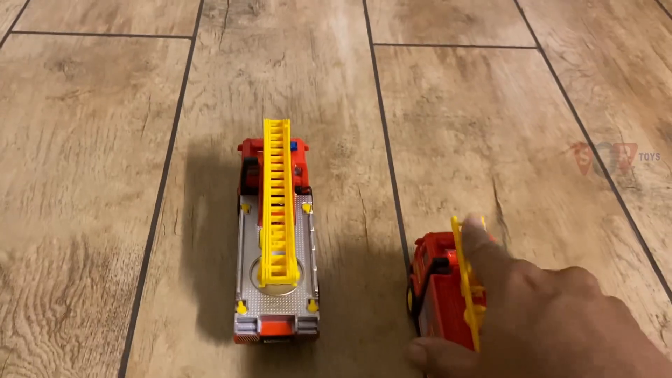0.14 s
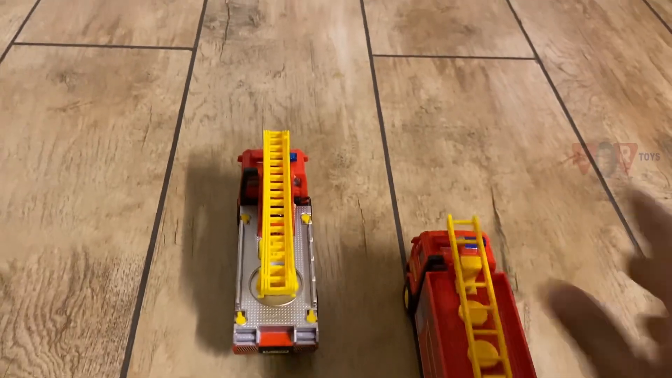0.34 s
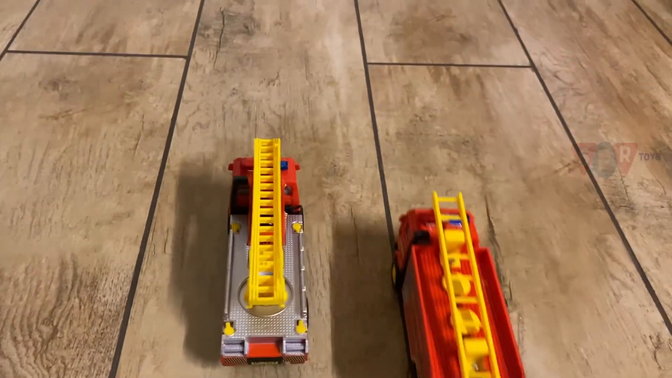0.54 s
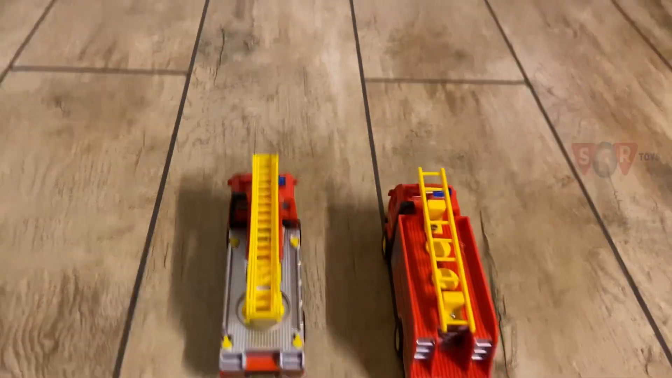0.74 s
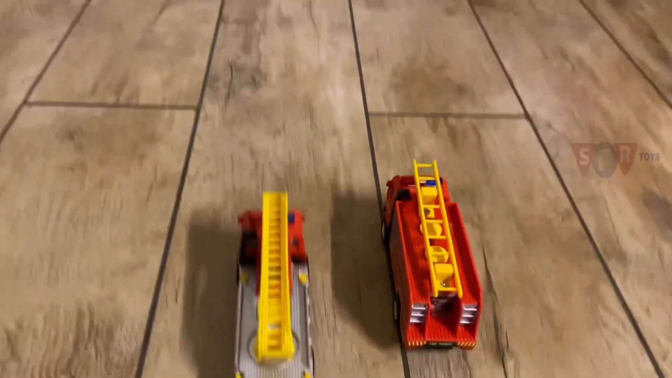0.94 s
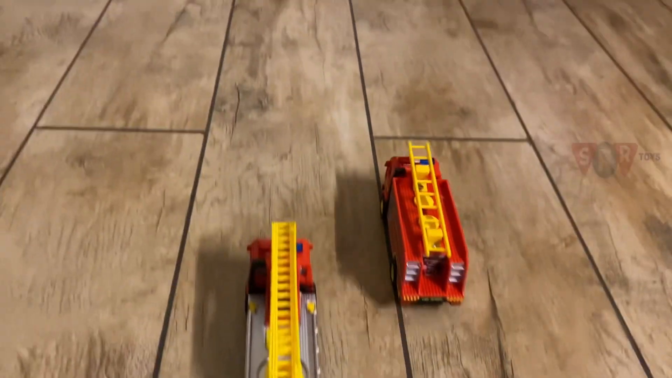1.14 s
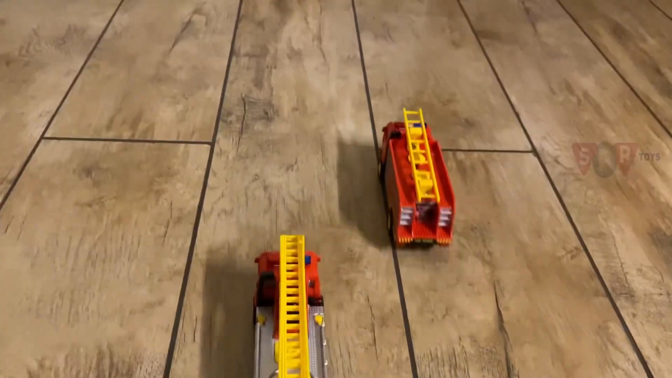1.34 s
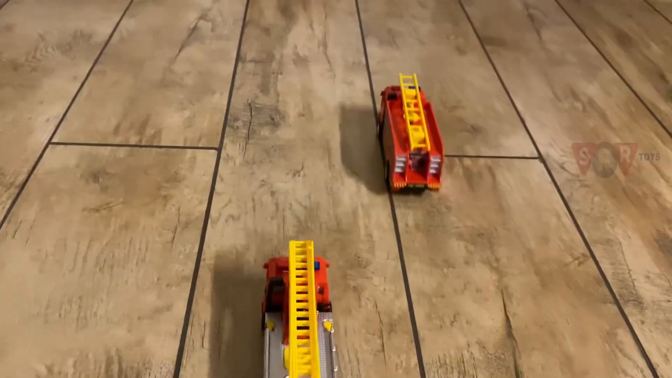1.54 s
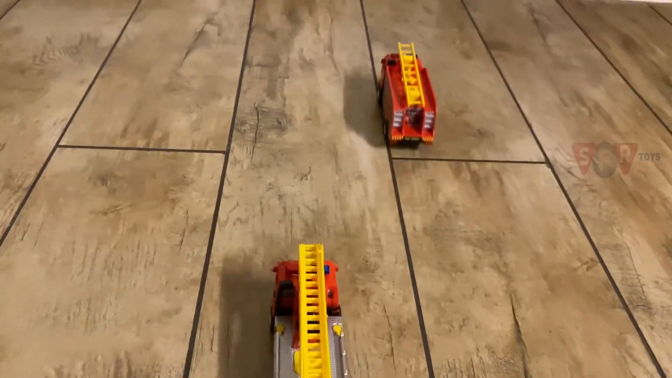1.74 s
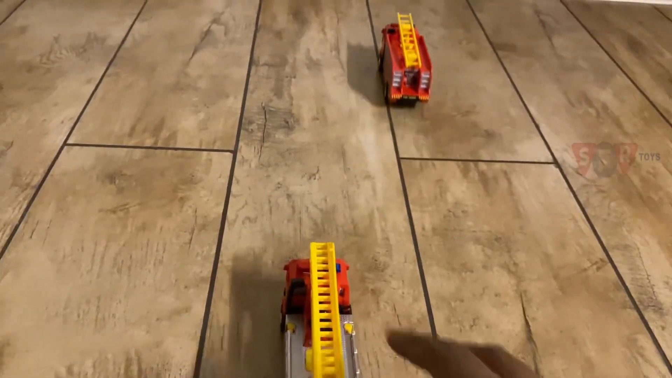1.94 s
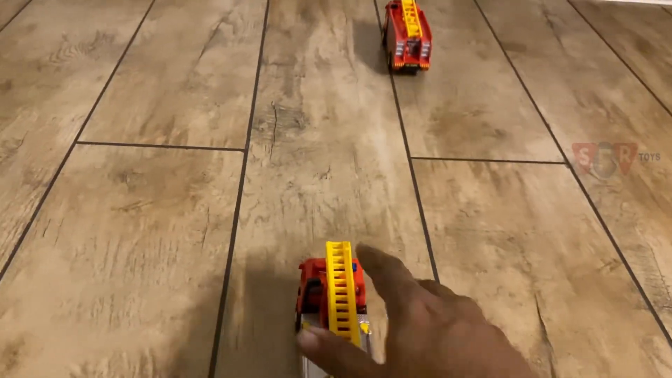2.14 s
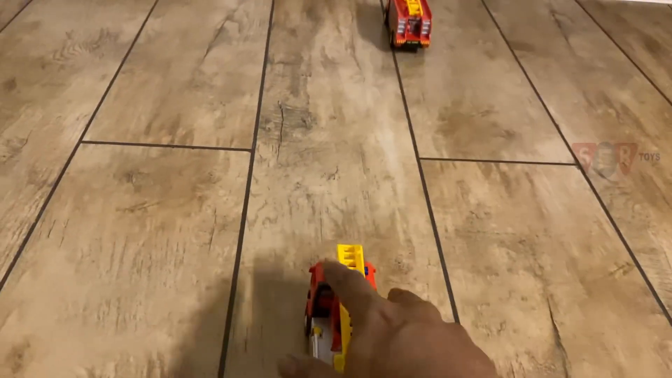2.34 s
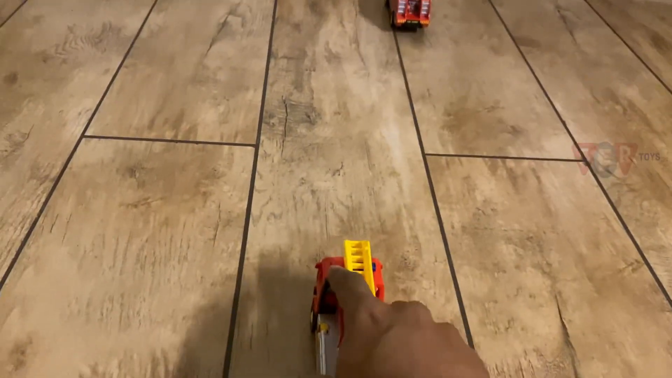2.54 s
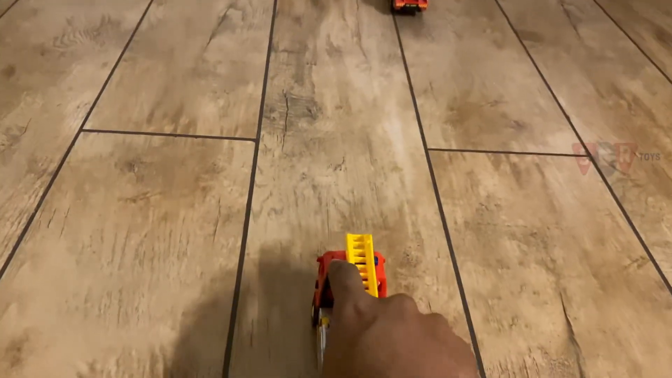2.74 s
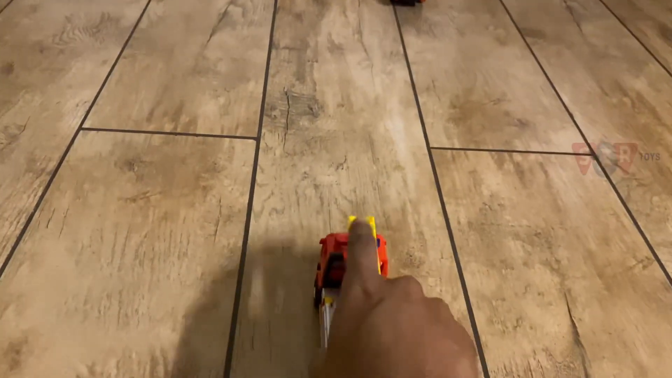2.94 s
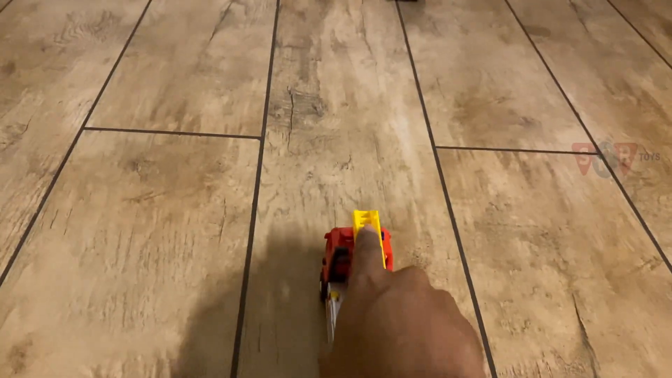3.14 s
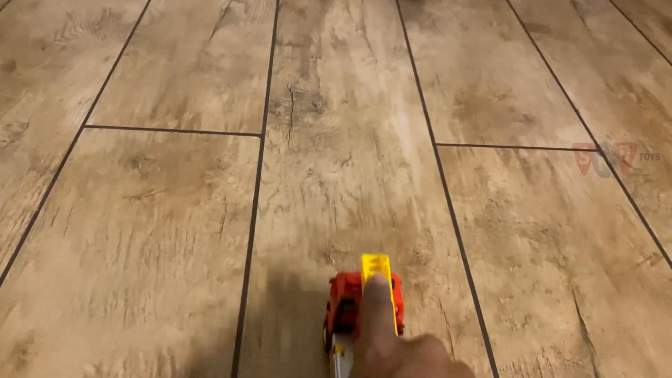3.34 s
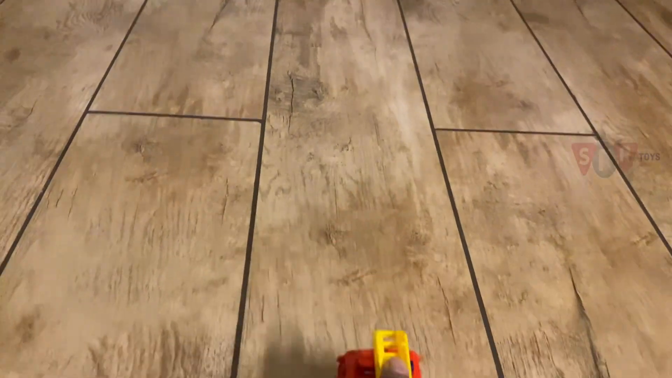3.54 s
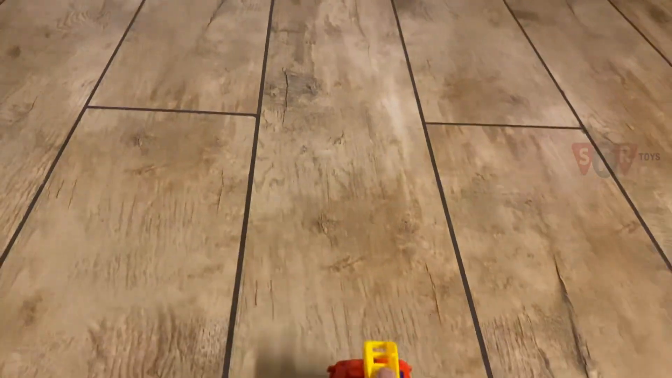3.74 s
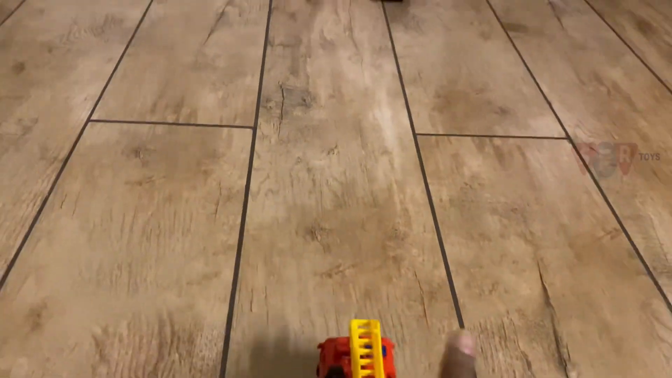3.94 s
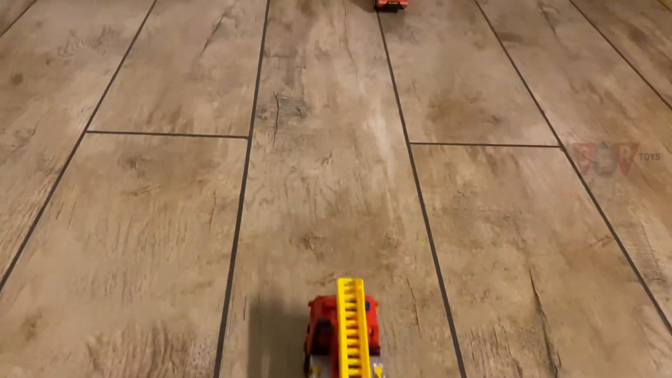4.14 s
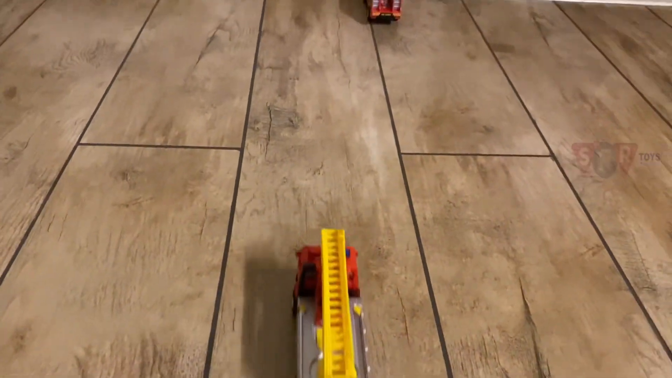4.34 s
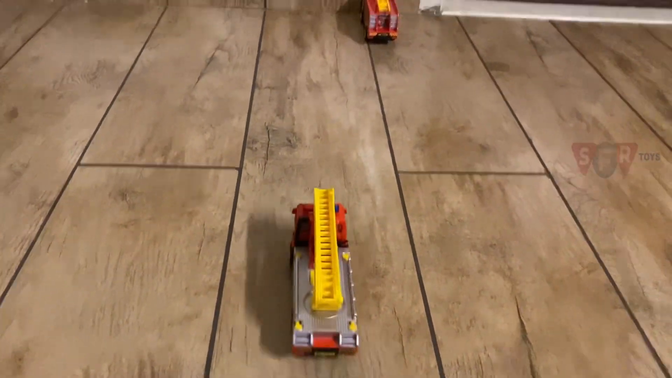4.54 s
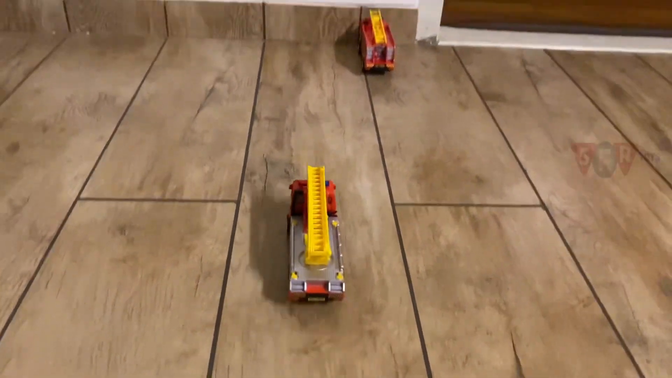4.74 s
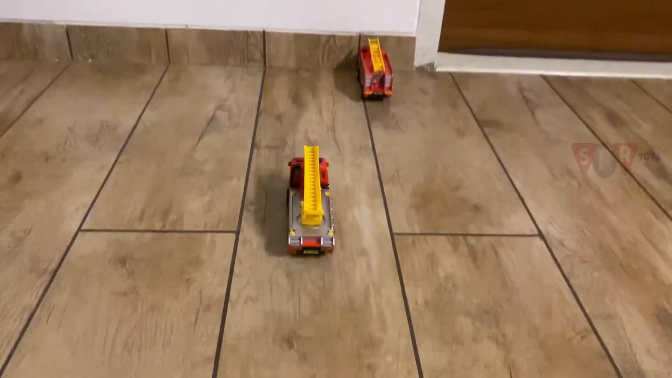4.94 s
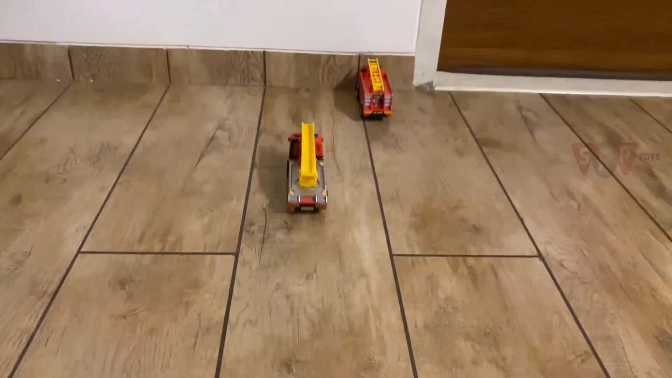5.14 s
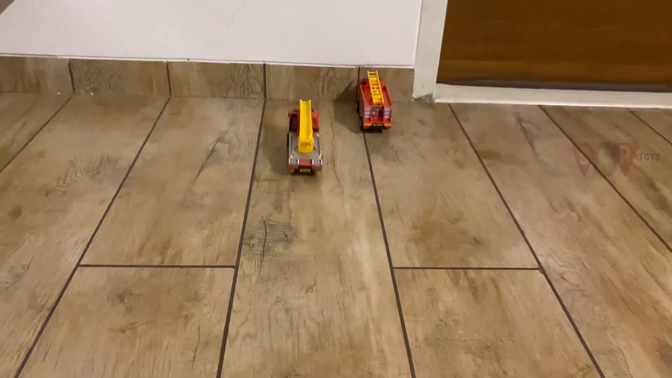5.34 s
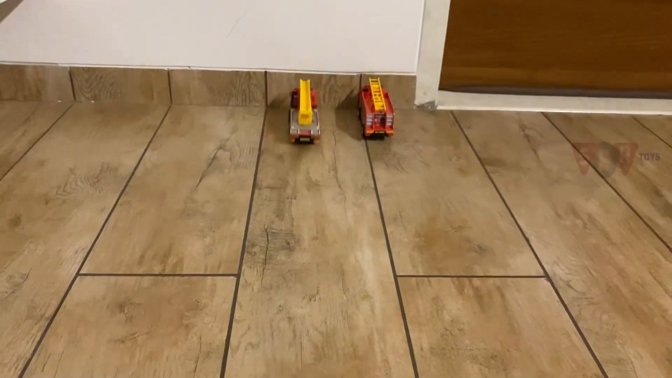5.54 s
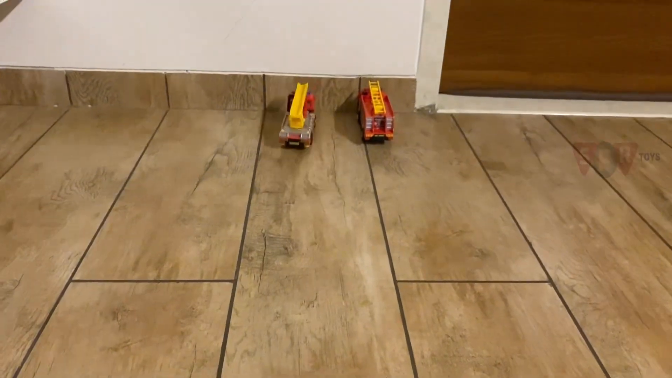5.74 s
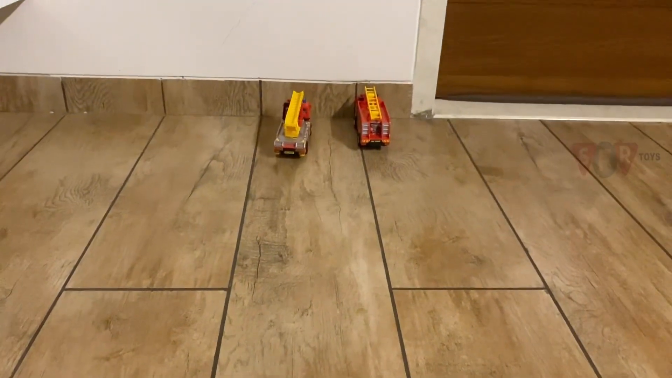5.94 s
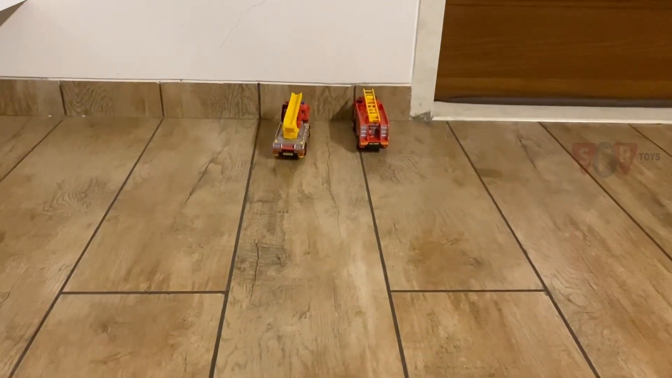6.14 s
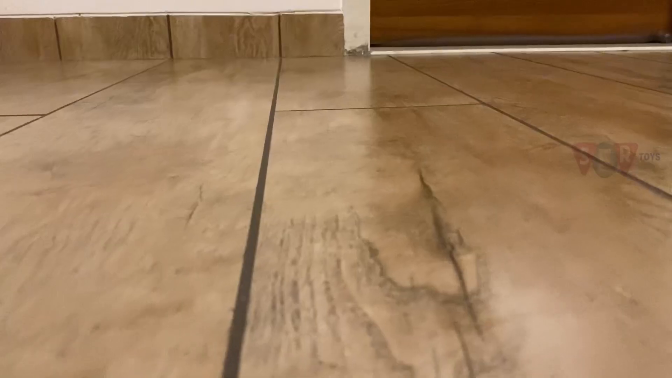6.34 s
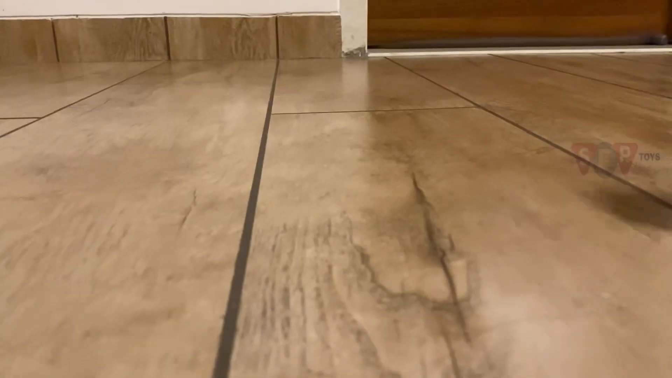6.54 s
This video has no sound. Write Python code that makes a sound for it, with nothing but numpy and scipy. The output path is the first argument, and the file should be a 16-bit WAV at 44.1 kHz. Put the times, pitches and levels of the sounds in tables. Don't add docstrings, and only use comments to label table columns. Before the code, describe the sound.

A toy truck buzzes off over tiles, a spring is ratcheted back by hand, then another truck rattles away and cracks into the wall base.

```python
import sys
import numpy as np
from scipy import signal
from scipy.fft import rfft, irfft
from scipy.io import wavfile
from scipy.ndimage import uniform_filter1d

SR = 44100
rng = np.random.default_rng(int(sys.argv[2]) if len(sys.argv) > 2 else 0)


def volts(x):
    e = np.asarray(x, float) / 20
    return 10 ** e


def store_pcm(level_fs):
    pcm = np.round(np.clip(level_fs, -1, 1) * 32767).astype(np.int16)
    wavfile.write(sys.argv[1], SR, np.atleast_2d(pcm).T)


N = 291060
CUT_S = 6.338

# [f/Hz, level/dB]
RUMBLE_COLOUR = [(15, -71.5), (25, -27.5), (45, -8.5), (64, 8), (102, 1), (156, -4), (215, -11.5),
                 (300, -20), (390, -52), (660, -120)]
AIR_COLOUR = [(150, -36), (200, 3.5), (450, -3), (800, -1), (1200, -10.5), (2000, -74)]
HISS_COLOUR = [(300, -8), (1000, -10.5), (3000, -17.5), (9000, -26), (16000, -36)]
# [t/s, level/dB]
DRONE_LEVEL = [(0, -79), (.65, -70.5), (3.8, -69.5), (4.6, -63), (6.04, -62.5), (6.3, -75), (6.35, -76.5),
               (6.6, -70)]
# [t/s, f/Hz, level/dB]
PHONE_THUMP = [
    (0.15, 119.9, -72),
    (0.256, 71.8, -49.5),
    (0.3, 75.6, -52.5),
    (0.528, 77, -60.5),
    (0.619, 71.9, -76),
]
# [t/s, level/dB, f/Hz, length/s]
CREAK = (2.88, -71, 425, .035)
# [f/Hz, t60/s]
ROOM_DECAY = [(250, 0.25), (660, 0.42), (1740, 0.51), (4590, 0.5), (12100, 0.36)]

# [t/s, level/dB, f/Hz, t60/s]
CRASH_BLOWS = [(5.6057, -18.5, 10300, 0.0087), (5.6056, -21, 4500, .008), (5.6067, -14, 2850, 0.023),
               (5.6103, -11.5, 1700, .008), (5.6135, -23.5, 9900, 0.01), (5.618, -23.5, 11000, .008),
               (5.618, -26, 5400, .012), (5.6062, -23, 1400, .014)]
# [f/Hz, level/dB]
CRASH_COLOUR = [(100, -20.5), (200, -19), (980, -21.5), (1130, 0.5), (1400, -6.5), (1680, -5), (2200, -11),
                (2900, -4.5), (3500, -9.5), (4500, -8.5), (7900, -12), (8550, -30), (9200, -11),
                (12000, -13), (16000, -33.5)]
# [f/Hz, width/Hz, level/dB]
BOARD_MODES = [(1660, 65, -3.5), (2900, 250, -1), (4540, 400, -5)]
# [f/Hz, level/dB]
BUMPER_COLOUR = [(500, -30), (1150, 0), (16000, 0)]

# [f/Hz, width/Hz, level/dB]
SHELL_MODES = [
    [(1110, 80, -7), (1400, 80, -1), (1790, 60, -5), (2520, 110, -4), (2750, 120, 0), (3370, 70, -12),
     (4650, 350, -18), (6790, 320, -13)],
    [(1640, 160, 0), (2900, 900, -10), (4400, 300, -17)],
    [(1170, 140, -8), (1380, 260, 0), (2000, 200, -8), (2520, 160, -2), (2900, 200, -2), (4350, 210, -10)],
    [(450, 400, 6), (2550, 500, -6), (3370, 500, -6)],
]
# [f/Hz, level/dB]
CLATTER_COLOUR = [(300, -34), (700, 1), (1250, 13), (3000, 6.5), (4500, -8), (8000, -33.5)]
FIZZ_COLOUR = [(2500, -9.5), (3800, 4), (7500, 1.5), (8500, 8), (11000, -0.5), (13500, -4), (15600, -6),
               (16000, -44)]
SHEEN_COLOUR = [(6000, -30), (10000, -6), (14000, 0), (16500, -3)]
SMALL_SHELL = [(250, -24), (500, -9.5), (800, 0.5), (16000, -1)]
# [clatter under the modes/dB, fizz tilt/(dB/octave), room/dB, knock t60/s,
# fizz at -60 dB effort/dB]
FEEL = [
    (-7, -2, -5, 0.042, -66),
    (-14.5, -1, -7, 0.02, -63),
    (-2.5, -2, -3.5, 0.012, -64),
    (6, 0, -6.5, 0.036, -68),
]
# [knock rattle/dB, knock ring/dB, ring t60/s, knock rise/s, panel clumps/dB,
# tick into shell/dB, pawl ring/dB]
TOUCH = [
    (-3.5, -0.5, 0.041, 0.0025, 8, -9, -11.5),
    (-5.5, 0.5, 0.027, 0.0015, 6.5, -16, -9),
    (-1, -3.5, 0.028, 0.00078, 6.5, -12.5, -8),
    (-0.5, -3, 0.032, 0.0012, 10, -17, -17),
]
# [extra fizz/dB, extra sheen/dB, fade/s]
NEAR = [
    (7, 5, .6),
    (0, 4, 1.5),
    (2.5, 3, .6),
    (0, -20, 1.5),
]
PAWLS_HZ = [6700, 4400, 4600, 4400]

# [t/s, level/dB]
FIRST_RUN = [
    (0, -73),
    (.235, -92),
    (.31, -67),
    (.79, -61),
    (1.52, -52.5),
    (2.2, -56),
    (2.7, -65.5),
    (3.01, -68.5),
    (3.15, -110),
]
WINDING = [
    (3.15, -106),
    (3.19, -65),
    (3.29, -54),
    (3.4, -48.5),
    (3.57, -54),
    (3.64, -61),
    (3.7, -81),
    (3.87, -71),
    (3.94, -87),
]
SECOND_RUN = [
    (3.94, -65),
    (4.028, -57.5),
    (4.168, -58.5),
    (4.782, -54),
    (5.226, -52.5),
    (5.62, -53.5),
]
CLOSE_WINDING = [
    (6.33, -63.5),
    (6.4, -59.5),
    (6.6, -57),
]
# [t/s, peak level/dB,
# f/Hz]
FIRST_KNOCKS = [(.382, -51.5, 4300), (.4644, -54, 3640), (.5218, -56.5, 1760), (.5732, -48.5, 1400),
                (.6176, -47, 2570), (.6365, -49, 1410), (.6745, -51, 1430), (.755, -50, 2600),
                (.7034, -46.5, 2534), (.7238, -48.5, 1386), (.7822, -48.5, 2680), (.8126, -46.5, 1480),
                (.8381, -56, 1380), (.8685, -52, 1370), (.8994, -43.5, 1445), (.945, -51, 2600),
                (.9628, -46, 1345), (1.0012, -40.5, 1395), (1.0281, -40.5, 2494), (1.0486, -47, 2800),
                (1.1005, -44, 2660), (1.3554, -44, 2700), (1.465, -43, 1386), (1.541, -46, 2650),
                (1.0665, -42.5, 2650), (1.092, -43.5, 2370), (1.1189, -38, 2690), (1.2426, -46, 2550),
                (1.288, -40.5, 1765), (1.3035, -36.5, 2756), (1.3329, -40.5, 1358), (1.3848, -43, 1540),
                (1.4452, -40, 2570), (1.4956, -47, 2650), (1.528, -46, 1420), (1.5569, -43, 2740),
                (1.611, -41, 2625), (1.6202, -38, 2650), (1.7, -47, 2690), (1.71, -44, 1390),
                   (1.8573, -48, 2710), (1.9133, -46.5, 2690), (1.982, -49, 1400), (2.207, -48, 2500),
                   (1.64, -40.5, 2750), (1.682, -42.5, 2750), (1.7484, -37.5, 2650), (1.7866, -50, 1790),
                   (1.893, -45, 2540), (1.9984, -43, 1493), (2.0503, -39.5, 2665), (2.069, -42, 2660),
                   (2.1336, -42.5, 2900), (2.152, -44.5, 1430), (2.187, -45, 2620), (2.2558, -40, 2716),
                   (2.336, -45.5, 2880), (2.467, -49.5, 2730), (2.353, -58, 1420), (2.492, -52, 2760),
                   (2.5145, -46.5, 2740), (2.5605, -55, 2900), (2.5954, -58, 2880), (2.636, -58.5, 1360),
                   (2.6742, -59, 2860), (2.7196, -60, 2850), (2.779, -59, 2900), (2.8882, -54, 3840),
                   (2.905, -56.5, 1190), (2.9312, -47, 2825), (2.9805, -55, 5250), (3.0314, -59.5, 2920)]
HAND_KNOCKS = [(.091, -62, 915), (0.104, -39.5, 1500), (.1045, -47, 4330), (.111, -44.5, 1400),
               (.124, -57, 1300), (3.2132, -52, 1645), (3.245, -55, 1100), (3.283, -47, 1550),
               (3.2996, -45, 1620), (3.313, -50, 1640), (3.354, -39, 1600), (3.385, -50, 1700),
               (3.4442, -43.5, 1610), (3.4796, -43.5, 1600), (3.537, -45, 1550), (3.5754, -49, 1650),
               (3.5942, -58, 1680), (3.6335, -52, 1720), (3.33, -39, 1730), (3.3716, -36.5, 1630),
               (3.4272, -45, 1660), (3.462, -38, 1576), (3.5095, -42, 1740), (3.5458, -36.5, 1760),
               (3.793, -55, 1590), (3.8079, -48, 2750), (3.8115, -48.5, 1385), (3.8274, -50, 4400),
               (3.8393, -53, 1360)]
SECOND_KNOCKS = [(3.982, -58.5, 1040), (4.121, -52, 1610), (4.1527, -58, 1290), (4.1823, -56, 2950),
                 (4.2452, -59, 2970), (4.274, -54, 2950), (4.3118, -49, 1280), (4.3254, -55, 1280),
                 (4.373, -60, 2980), (4.4095, -53, 1160), (4.471, -56, 1290), (4.5067, -54, 2950),
                 (4.549, -53, 2010), (4.567, -49, 1330), (4.593, -52, 2430), (4.6198, -49.5, 1340),
                 (4.9131, -45.5, 2450), (5.3287, -47, 2540), (4.6626, -47, 1340), (4.7023, -42, 2490),
                 (4.7111, -34, 2420), (4.8259, -45, 2400), (4.8358, -34, 2530), (4.9513, -37, 2050),
                 (5.0589, -36, 1370), (5.1615, -39, 1400), (5.2622, -39.5, 1250), (5.362, -41.5, 2810),
                 (5.4025, -46.5, 1390), (5.452, -43, 1170), (5.511, -48, 2450), (5.565, -47.5, 2460)]
CLOSE_KNOCKS = [
    (6.3922, -48.5, 3410),
    (6.5337, -51, 1550),
    (6.5365, -45.5, 3490),
]
# [t/s, peak level/dB]
FIRST_TICKS = [(0.3833, -46), (0.4614, -48), (0.5217, -48), (0.57, -48), (0.6182, -52), (0.6487, -70),
               (0.676, -63), (0.705, -47.5), (0.7449, -49.5), (0.7773, -51), (0.8116, -47.5),
               (0.8382, -51), (0.8997, -56), (0.9457, -52), (0.9782, -47), (1.0043, -49), (1.0286, -49.5),
               (1.0558, -49), (1.085, -48), (1.1176, -43), (1.14, -54), (1.197, -50), (1.2179, -50),
               (1.2405, -50), (1.2882, -56), (1.3025, -41.5), (1.3316, -57), (1.3552, -50), (1.387, -43),
               (1.4436, -49), (1.5102, -47), (1.538, -57), (1.5707, -48),
               (1.5906, -51), (1.6193, -48), (1.6964, -49), (1.7245, -46), (1.767, -47.5), (1.8079, -51),
                  (1.844, -48), (1.8925, -48), (1.9061, -49), (1.9455, -51), (1.966, -58), (1.9974, -52),
                  (2.0128, -48), (2.0478, -48), (2.0762, -51), (2.1112, -47.5), (2.1517, -50),
                  (2.1685, -50), (2.189, -54), (2.2099, -54), (2.2334, -47.5), (2.256, -52), (2.28, -50),
                  (2.305, -49), (2.3307, -47.5), (2.3534, -48.5), (2.3787, -51), (2.4095, -57),
                  (2.439, -56), (2.4644, -54), (2.4926, -55), (2.5267, -54), (2.5595, -50), (2.5953, -51.5),
                  (2.637, -49.5), (2.6754, -47.5), (2.7205, -51), (2.7797, -60), (2.846, -54.5),
                  (2.8889, -52), (2.9165, -49.5), (2.9325, -47), (2.9557, -53), (2.9805, -48.5),
                  (3.0308, -53.5)]
HAND_TICKS = [(0.1045, -49), (0.1344, -58), (3.191, -55), (3.212, -50.5), (3.244, -62), (3.281, -38.5),
              (3.3288, -44), (3.3535, -36), (3.3698, -32.5), (3.4241, -34.5), (3.4438, -40.5),
              (3.5429, -47), (3.5548, -38), (3.5755, -45), (3.6033, -41), (3.6177, -42), (3.633, -46),
              (3.8079, -43), (3.8268, -51), (3.936, -53.5)]
SECOND_TICKS = [(3.9933, -49), (4.0382, -44), (4.0856, -48), (4.1205, -48), (4.1529, -48), (4.1828, -49),
                (4.2123, -50), (4.2437, -53), (4.2736, -50), (4.3016, -45), (4.351, -50), (4.3714, -51),
                (4.4009, -46.5), (4.4263, -59), (4.4487, -54), (4.4692, -43.5), (4.5081, -44),
                (4.5271, -44), (4.548, -48), (4.5665, -44), (4.5924, -49), (4.6209, -47), (4.6812, -44),
                (4.7012, -34.5), (4.8354, -39.5), (4.8833, -45), (4.9127, -45), (4.9506, -41.5),
                (5.0594, -41.5), (5.1472, -49), (5.1616, -39), (5.2504, -46.5), (5.2634, -43.5),
                (5.3148, -43.5), (5.3282, -42), (5.3527, -46), (5.3736, -43), (5.4175, -48), (5.442, -44.5),
                (5.5083, -46), (5.5363, -46.5), (5.5662, -47.5)]
CLOSE_TICKS = [(6.3764, -46.5), (6.4083, -44.5), (6.44, -45), (6.4732, -45), (6.4996, -43), (6.529, -42.5),
               (6.558, -44.5)]

# [f/Hz, phase/rad]
PORT_LEAD = [
    [(0, 0), (1380, -.2), (3700, 1.2), (6630, -.2), (7700, -.8), (8200, -2.9), (8800, -3.35), (9250, -4.4),
     (10400, -6.2), (11600, -6.3), (12700, -9.0), (14200, -9.7), (15200, -12.4), (16700, -12.6)],
    [(0, 0), (260, 0.1), (860, -2.9), (1120, -2.7), (2070, -6.1), (3960, -7.2), (4910, -7.8), (5600, -7.3),
     (7670, -8.6), (8350, -8.5), (9820, -7.4), (10500, -7.1), (11800, -6.3), (16700, -6.3)],
]
# [f/Hz, level/dB]
PORT_TILT = [
    [(60, 3.5), (200, 1), (2000, 1.5), (5000, 3), (7500, 3.5), (8200, 0)],
    [(200, -3), (700, -7), (5500, -10), (7500, -2), (9000, 0)],
]
# [f/Hz, shared part 0..1]
PORT_MERGE = [(230, .93), (450, .45), (800, .1), (1500, .25), (3000, 0), (7600, 0), (8200, .95),
              (9100, .95), (9800, .7), (12300, .8), (13000, .975)]


def evened(x):
    return x / np.sqrt(np.mean(x ** 2) + 1e-20)


def read(points, hz):
    f, value = np.transpose(points)
    return np.interp(np.log(hz + 1), np.log(f + 1), value)


def fader(points):
    s, db = np.transpose(points)
    return volts(np.interp(np.arange(N) / SR, s, db, -140, -140))


def colour(x, points, tilt_db=0):
    hz = abs(np.fft.fftfreq(4096, 1 / SR))
    gain = np.log(volts(read(points, hz) + tilt_db * np.log2(hz / 6000 + 1e-2)))
    taps = np.fft.ifft(np.exp(gain - 1j * signal.hilbert(gain).imag)).real[:2048]
    return signal.oaconvolve(x, taps / np.linalg.norm(taps))[:len(x)]


def resonate(x, hz, width):
    r = np.exp(-np.pi * width / SR)
    angle = 2 * np.pi * hz / SR
    return signal.lfilter([1 - r * r], [1, -2 * r * np.cos(angle), r * r], x) * np.sin(angle)


def hum_band(x, hz, width):
    return evened(resonate(resonate(x, hz, width), hz, width))


def add(mix, s, sound):
    part = mix[round(s * SR):][:len(sound)]
    part += sound[:len(part)]


def clumps(depth_db, length_s):
    span = round(length_s * SR / 32)
    slow = uniform_filter1d(rng.standard_normal(N // 32 + 1), span)
    slow = evened(uniform_filter1d(slow, span))
    return np.repeat(volts(depth_db * np.tanh(slow)), 32)[:N]


def burst(db, t60, rise):
    t = np.arange(1300) / SR
    shape = volts(-60 * t / t60) * np.minimum(t / rise, 1)
    noise = shape * rng.standard_normal(len(t))
    return volts(db) * noise * np.linalg.norm(shape) / np.linalg.norm(noise)


def ring(db, hz, t60, rough=0.7, rise=.00012):
    t = np.arange(1300) / SR
    flutter = evened(uniform_filter1d(rng.standard_normal(len(t)), size=14))
    tone = np.sin(2 * np.pi * hz * t) * (1 + rough * flutter)
    return volts(db - 60 * t / t60) * tone * np.minimum(t / rise, 1)


def air():
    noise = rng.standard_normal((3, 2, N))
    t = np.arange(N) / SR
    after_cut = t > CUT_S
    crash_s = CRASH_BLOWS[0][0]
    thud = (t > crash_s) * volts(-60 * abs(t - crash_s) / 0.51)

    rumble = volts(-61 - 12 * np.maximum(1 - t / 0.21, 0) - 25 * after_cut) * clumps(2.5, .05)
    boom = [evened(evened(colour(v, RUMBLE_COLOUR)) + 0.64 * hum_band(v, 66, 22)) for v in noise[0]]

    drone = fader(DRONE_LEVEL) * clumps(1.2, 0.049) + volts(-51) * thud
    hum = [hum_band(v, 152, 18) for v in noise[1]]

    rolling = fader(FIRST_RUN) * volts(5.0 - 4.16 * t)
    rolling = rolling + volts(-9.5) * (fader(WINDING) + fader(SECOND_RUN))
    low = volts(-79.5) + volts(-12.5) * rolling + volts(-49.5) * thud
    wash = [evened(colour(v, AIR_COLOUR)) for v in noise[2]]

    rub = volts(-59.5) * np.clip((t - CUT_S) / 0.19 + 0.24, 0, 1) * after_cut
    skin = [hum_band(v, 495, 360) for v in noise[2]]

    s, db, hz, length = CREAK
    creak = volts(db) * np.sin(2 * np.pi * hz * t) * np.exp(-((t - s) / length) ** 2)

    s, hz, db = np.transpose(PHONE_THUMP)
    phase = 2 * np.pi * np.cumsum(np.interp(t, s, hz)) / SR
    thump = np.sqrt(2) * volts(np.interp(t, s, db, -140, -140)) * np.sin(phase)
    return rumble * boom + drone * hum + low * wash + rub * skin + creak + thump


def room(x):
    slots = np.arange(300, SR - 20, 12)
    at = slots + rng.integers(0, 12, (2, len(slots)))
    taps = np.zeros((2, SR))
    np.put_along_axis(taps, at, rng.choice([-1., 1.], at.shape), 1)
    hz, t, z = signal.stft(taps, SR, nperseg=256)
    decay = volts(-60 * t / read(ROOM_DECAY, hz)[:, None])
    tail = signal.istft(z * decay, SR, nperseg=256)[1]
    return signal.fftconvolve(x[None], tail / np.linalg.norm(tail[0]), axes=1)[:, :N]


def crash():
    direct, feed = np.zeros((2, N))
    start = CRASH_BLOWS[0][0]
    for s, db, hz, t60 in CRASH_BLOWS:
        add(direct, s, ring(db, hz, t60, rough=.3))
    add(direct, start, burst(-25.5, 0.038, .0008))
    add(feed, start, volts([2.5]))
    board = sum(volts(db) * resonate(feed, hz, width) for hz, width, db in BOARD_MODES)
    board = volts(-5.5) * board / np.linalg.norm(board)
    return colour(direct, BUMPER_COLOUR), colour(feed, CRASH_COLOUR) + board


def chatter(per_s, spread_db):
    size = volts(spread_db * np.minimum(rng.exponential(1, N), 3)) * rng.choice([-1, 1], N)
    return size * (rng.random(N) < per_s / SR)


def body(teeth, level, blows, modes, clatter_db, clump_db):
    click = signal.unit_impulse(2048)
    panels = [volts(db) * resonate(click, hz, 0.8 * width) for hz, width, db in modes]
    panels.append(volts(clatter_db - 13.5) * colour(click, CLATTER_COLOUR))
    # extra dB a dB, by octaves over 1400 Hz
    brighten = [0.67 * np.clip(np.log2(hz / 1400), 0, 1) for hz, *_ in modes]
    wakes = [(level / volts(-60)) ** more for more in brighten] + [1]
    shared = teeth * clumps(2.6, .01)
    shell = np.zeros(N)
    for wake, panel in zip(wakes, panels):
        drive = level * wake * evened(shared * clumps(clump_db, .018)) + blows
        shell += signal.oaconvolve(drive, panel)[:N]
    return shell / np.linalg.norm(sum(panels))


def truck(run, knocks, ticks, modes, feel, touch, near, pawl_hz):
    clatter_db, tilt_db, room_db, knock_s, fizz_db = feel
    rattle_db, ring_db, ring_s, rise_s, clump_db, shell_db, pawl_db = touch
    near_db, sheen_db, fade_s = near

    gears = fader(run)
    close = np.exp(-np.maximum(np.arange(N) / SR - run[1][0], 0) / fade_s)
    fizz = volts(fizz_db) * (gears / volts(-60)) ** 0.82 * volts(near_db * close)

    blows, rings, snaps = np.zeros((3, N))
    length_db = 20 * np.log10(.024 / knock_s) / 2
    for s, db, hz in knocks:
        add(blows, s, burst(db + rattle_db + length_db, knock_s, rise_s))
        add(rings, s, ring(db + ring_db, hz, ring_s, 0.57, rise_s))
    for s, db in ticks:
        add(snaps, s, burst(db - 5.5, 0.037, 0.00079))
        pitch = pawl_hz * (1 + .06 * rng.standard_normal())
        add(rings, s, ring(db + pawl_db, pitch, t60=.011))

    hits = blows + volts(shell_db) * snaps
    low = body(chatter(1200, 3.5), volts(-5.5) * gears, hits, modes, clatter_db, clump_db)
    teeth = evened(chatter(3000, 4.2) * clumps(2.5, 0.011))
    high = colour(fizz * volts(-2.0) * teeth + snaps, FIZZ_COLOUR, tilt_db)
    high = high + volts(sheen_db - 12) * close * colour(high, SHEEN_COLOUR)
    direct = colour(low + rings, SMALL_SHELL) + high
    return direct, volts(room_db) * direct


def ports(pair, lead, tilt):
    hz, (left, right) = np.fft.rfftfreq(N, 1 / SR), rfft(pair)
    same = np.clip(read(PORT_MERGE, hz), 0, 1)
    mid = (left + right) / 2
    side = (left - right) / 2 * np.sqrt(1 - same)
    turn = np.exp(.5j * np.interp(hz, *np.transpose(lead))) * volts(read(tilt, hz) / 2)
    return irfft([(mid + side) * turn, (mid - side) / turn], N)


def scene():
    runs = FIRST_RUN, WINDING, SECOND_RUN, CLOSE_WINDING
    knocks = FIRST_KNOCKS, HAND_KNOCKS, SECOND_KNOCKS, CLOSE_KNOCKS
    ticks = FIRST_TICKS, HAND_TICKS, SECOND_TICKS, CLOSE_TICKS
    settings = zip(runs, knocks, ticks, SHELL_MODES, FEEL, TOUCH, NEAR, PAWLS_HZ)
    parts = [truck(*one) for one in settings]
    still = air()
    direct, feed = np.sum(parts[:3] + [crash()], 0)
    first = ports(direct + room(feed) + still, PORT_LEAD[0], PORT_TILT[0])
    direct, feed = parts[3]
    second = ports(direct + room(feed) + still, PORT_LEAD[1], PORT_TILT[1])
    return np.where(np.arange(N) < CUT_S * SR, first, second)


def low_pass(x):
    return signal.sosfilt(signal.butter(12, 17130, fs=SR, output="sos"), x)


def record(dry):
    hiss = volts(-81.5) * np.array([colour(v, HISS_COLOUR) for v in rng.standard_normal(dry.shape)])
    edge = signal.firwin(255, 16600, window=("kaiser", 8), fs=SR)
    mix = signal.oaconvolve(dry + hiss, edge[None], "same")
    return low_pass(mix)


dry = scene()
out = record(dry)
store_pcm(out)
```